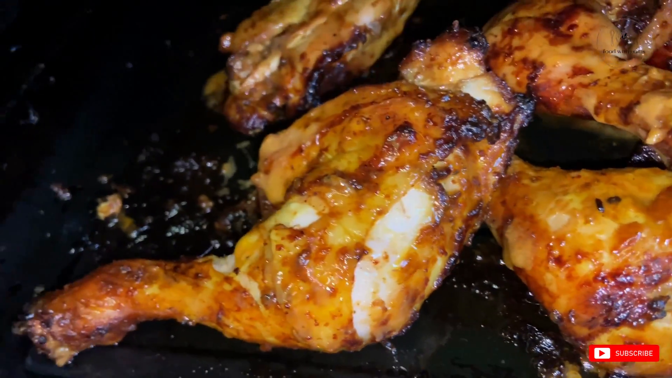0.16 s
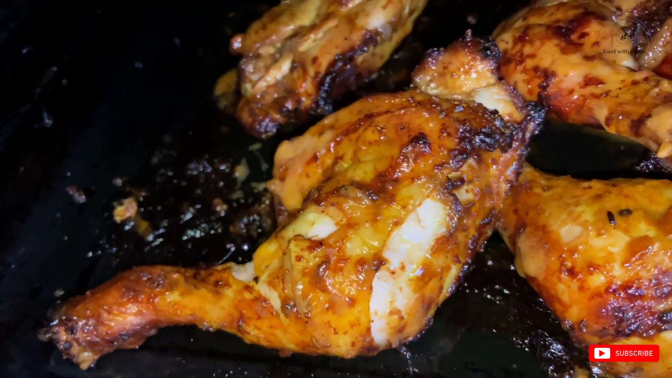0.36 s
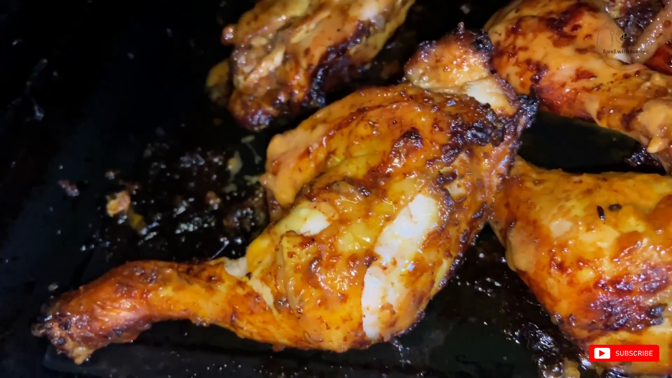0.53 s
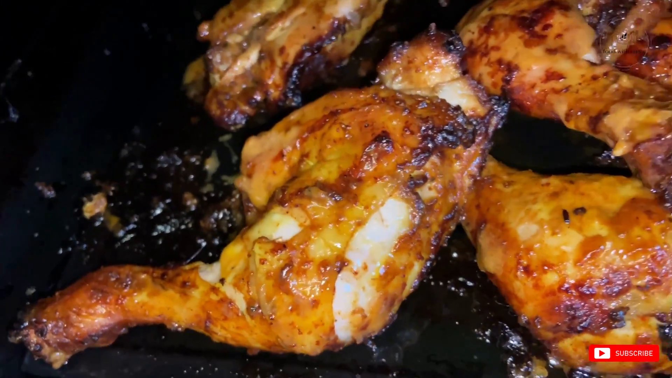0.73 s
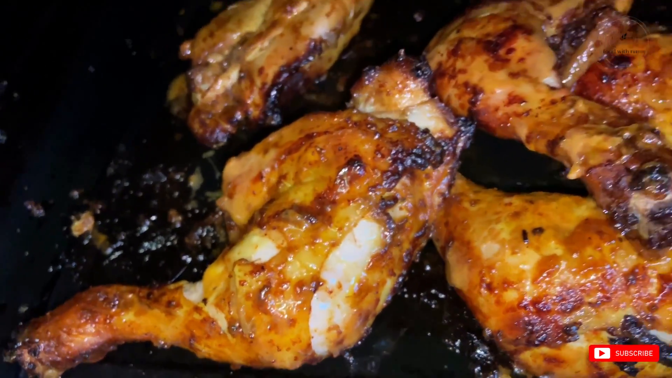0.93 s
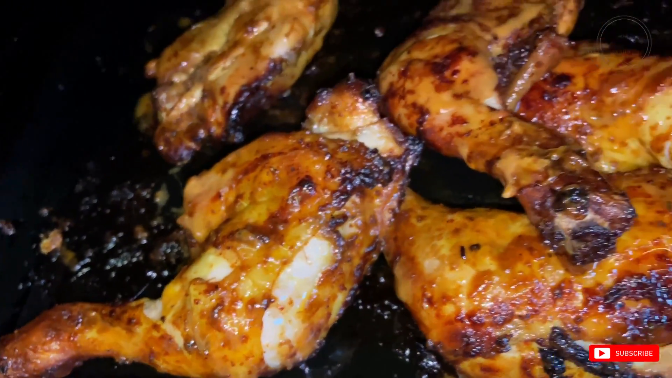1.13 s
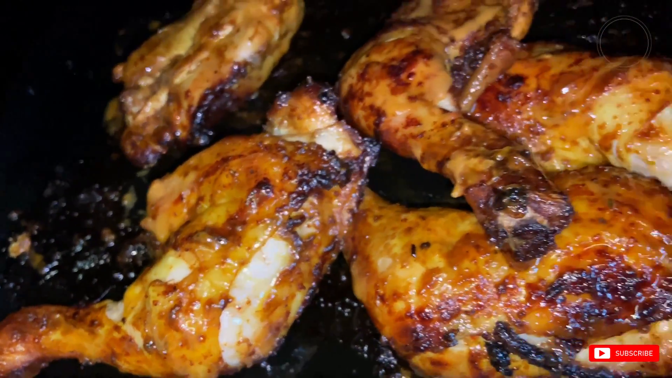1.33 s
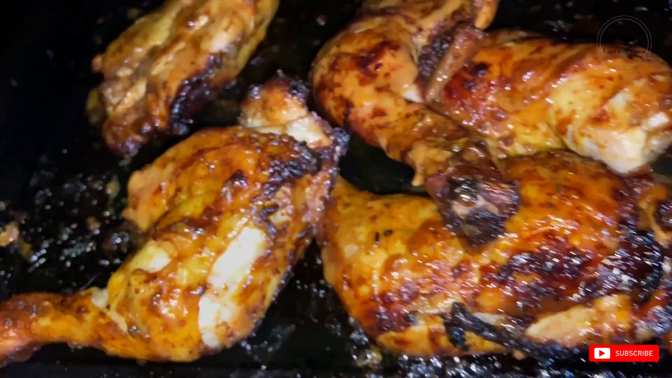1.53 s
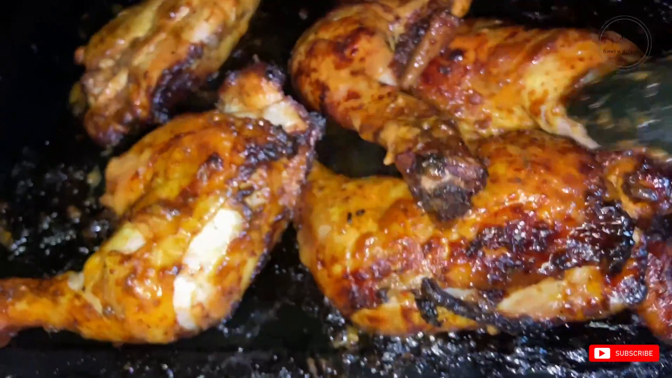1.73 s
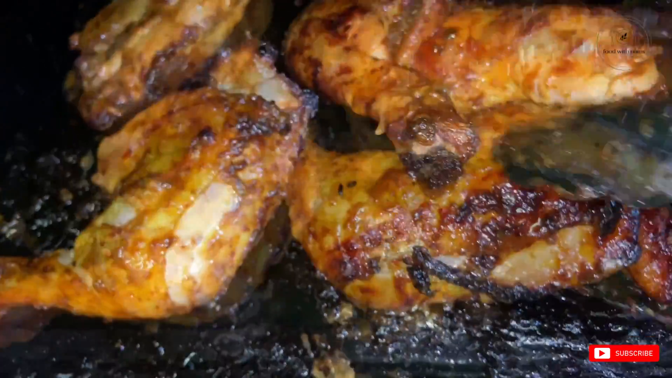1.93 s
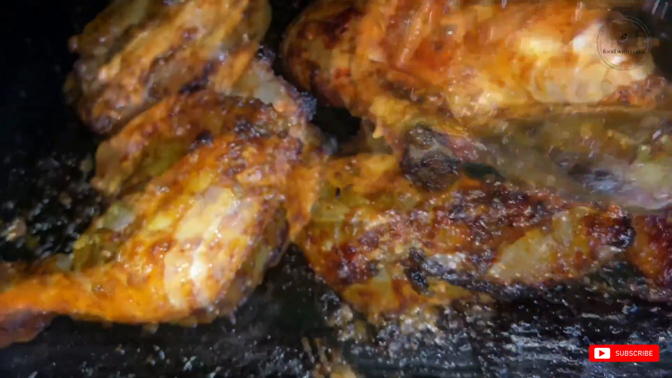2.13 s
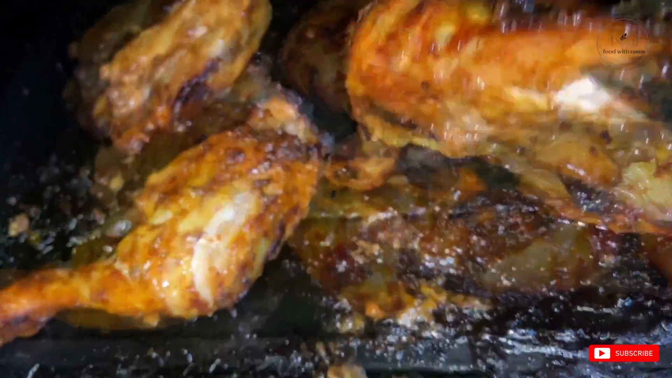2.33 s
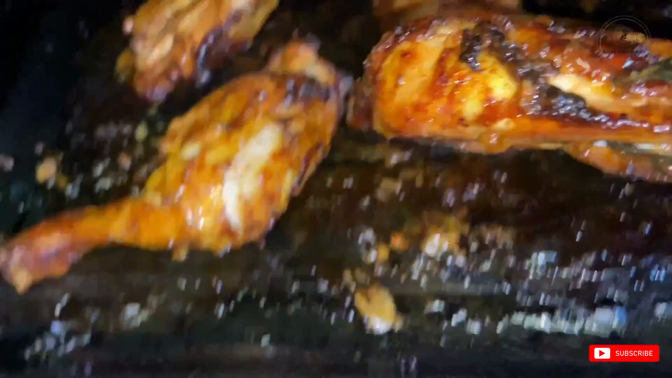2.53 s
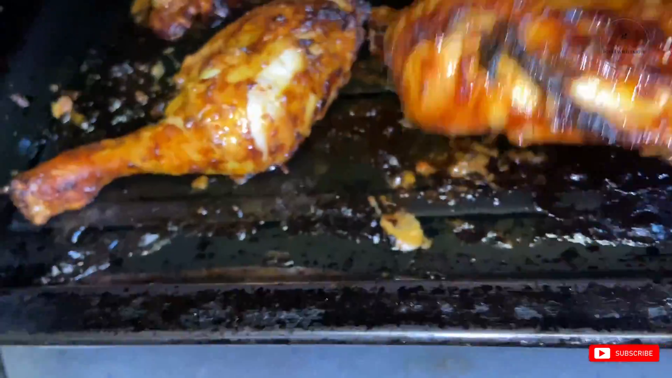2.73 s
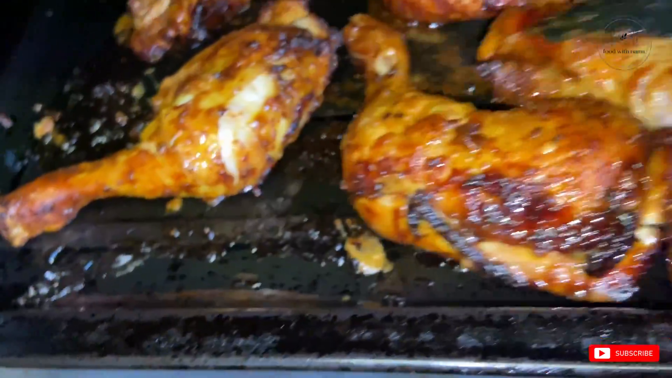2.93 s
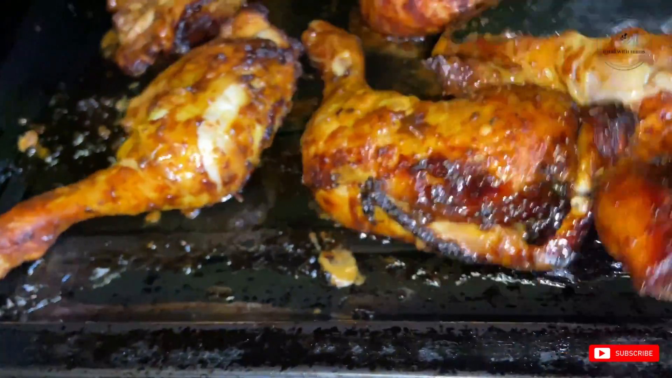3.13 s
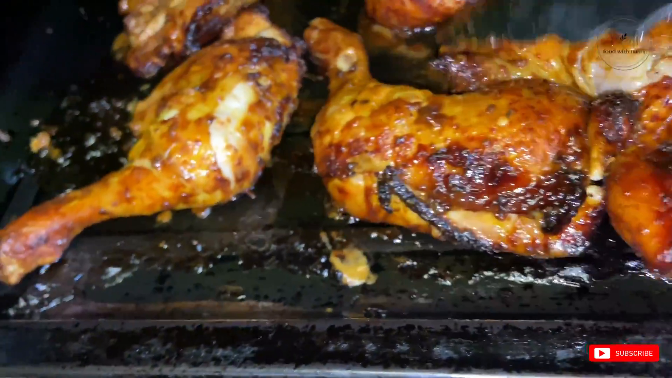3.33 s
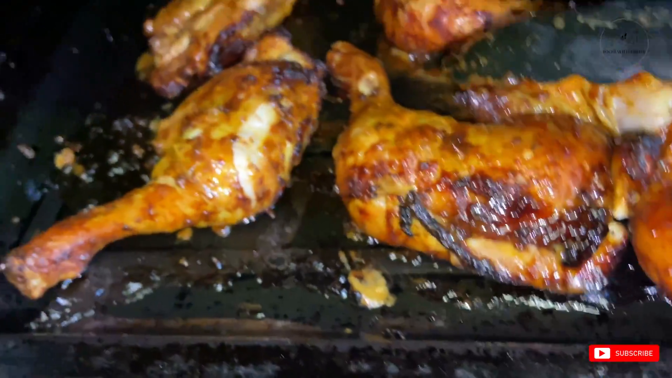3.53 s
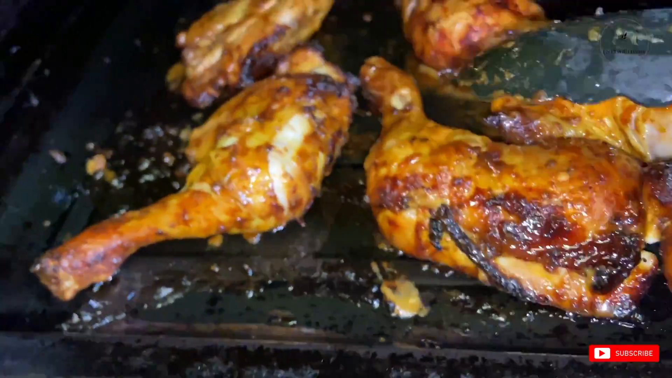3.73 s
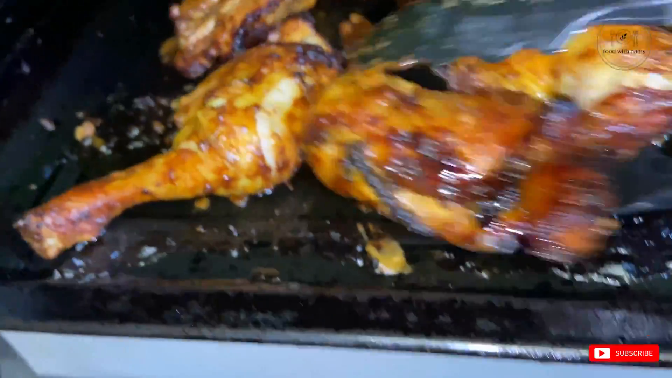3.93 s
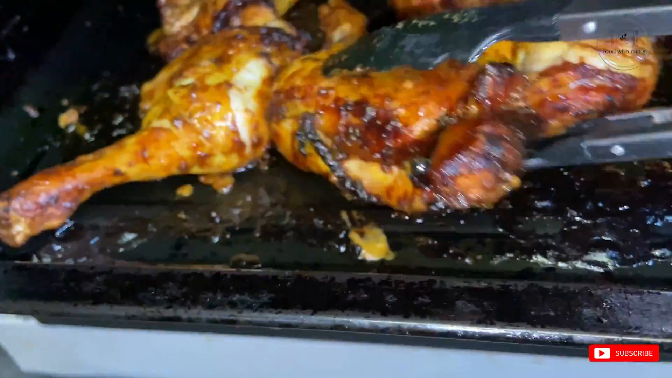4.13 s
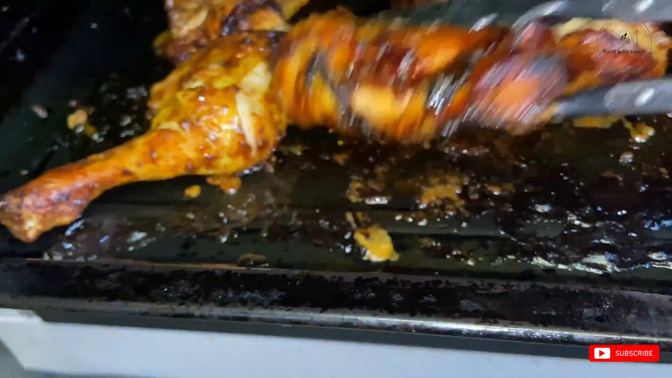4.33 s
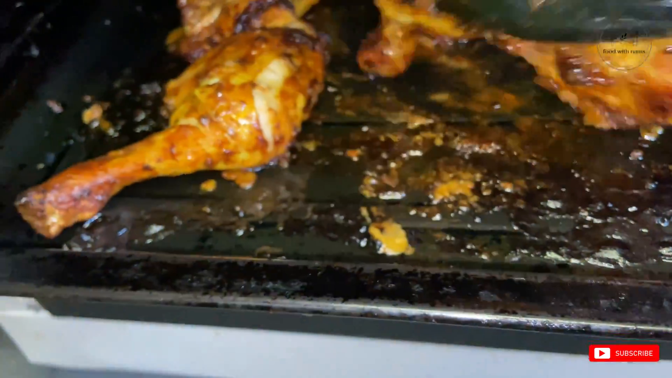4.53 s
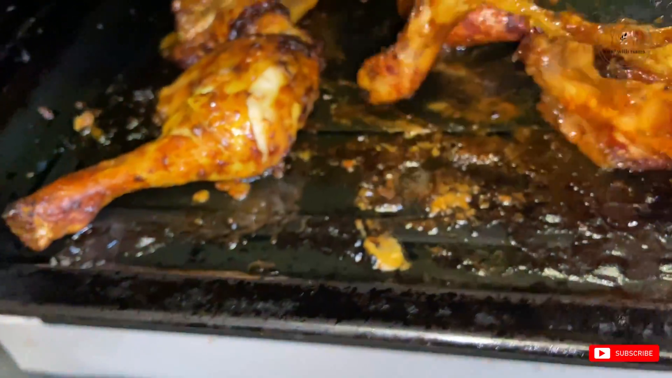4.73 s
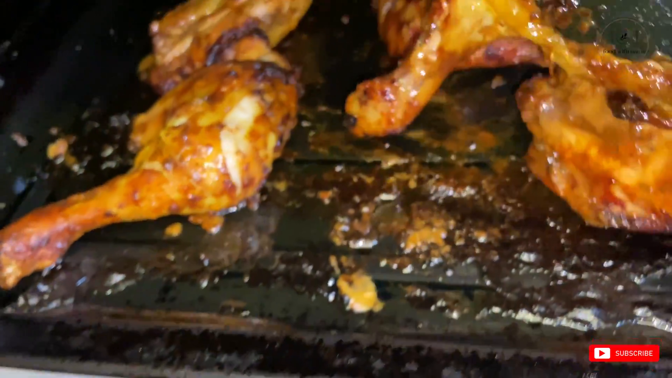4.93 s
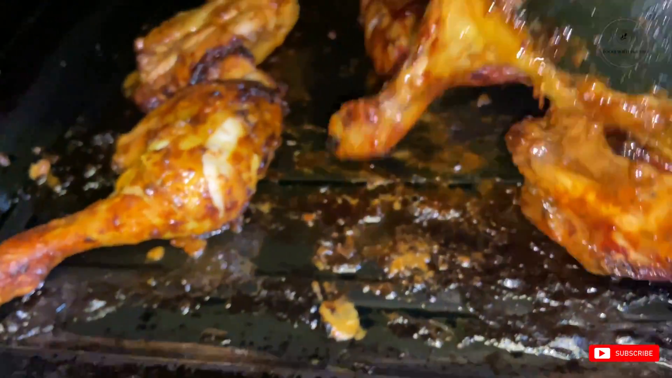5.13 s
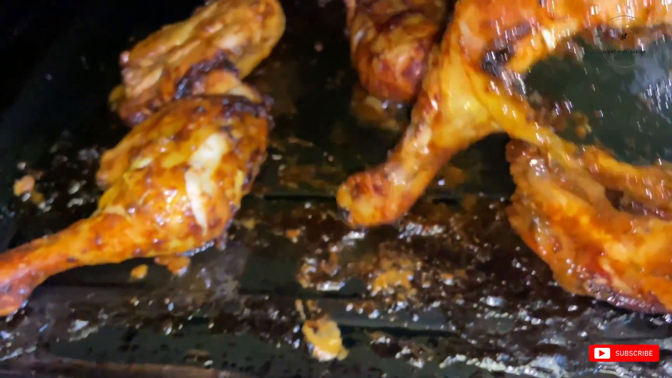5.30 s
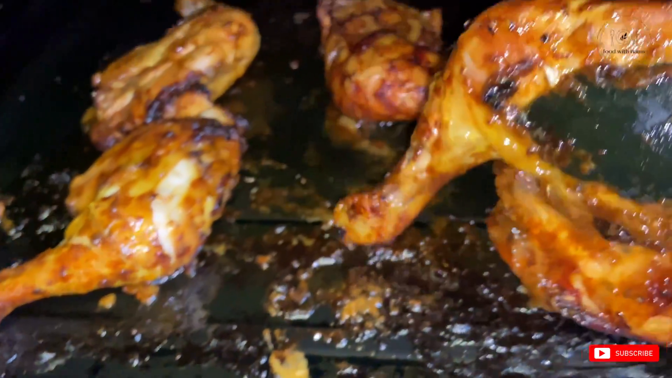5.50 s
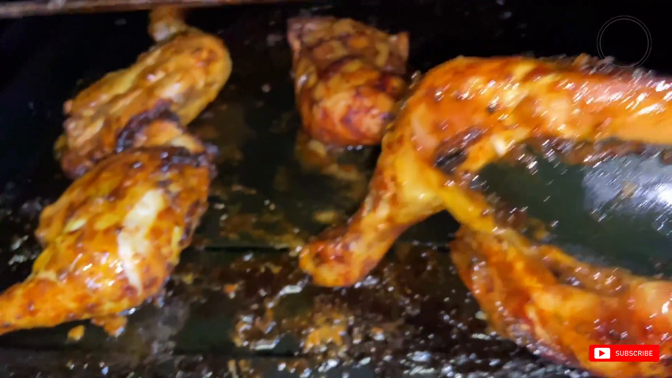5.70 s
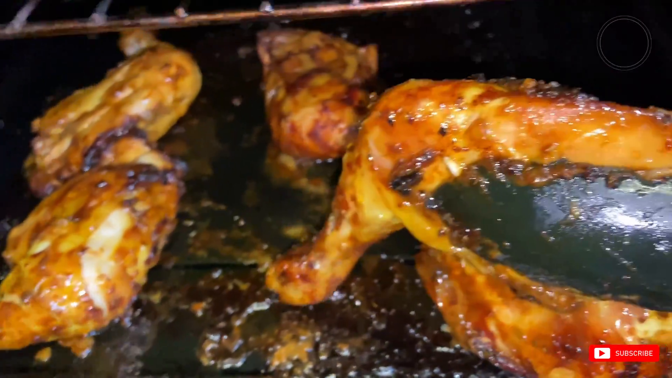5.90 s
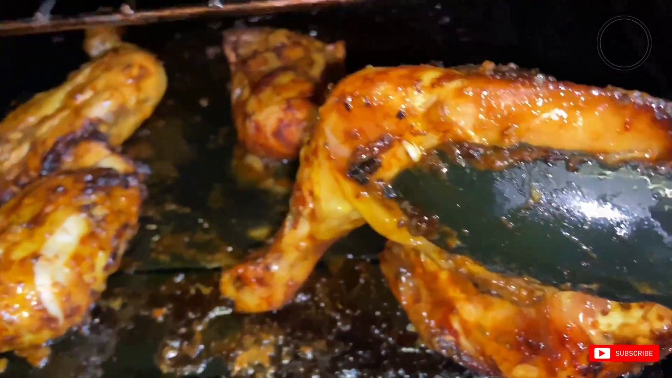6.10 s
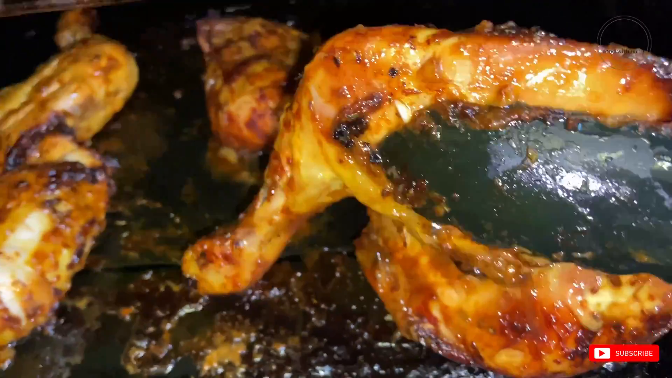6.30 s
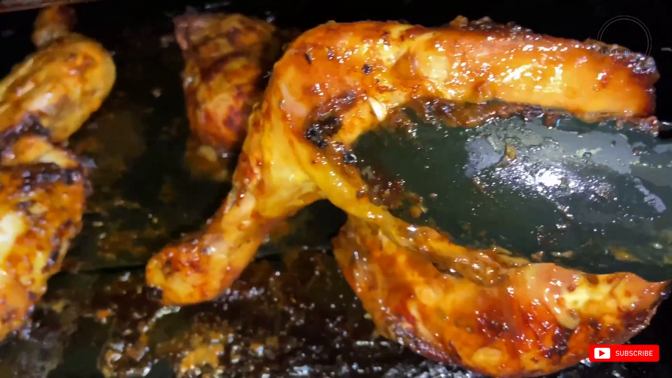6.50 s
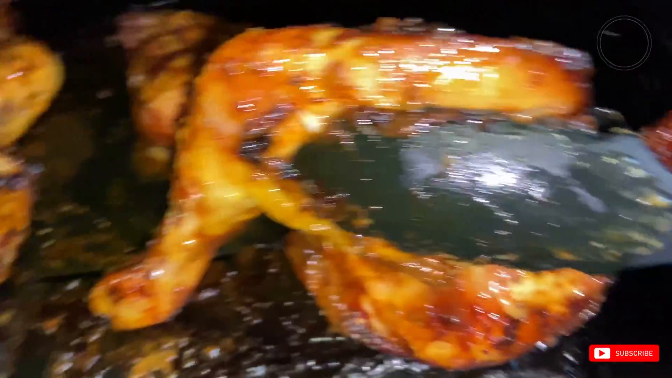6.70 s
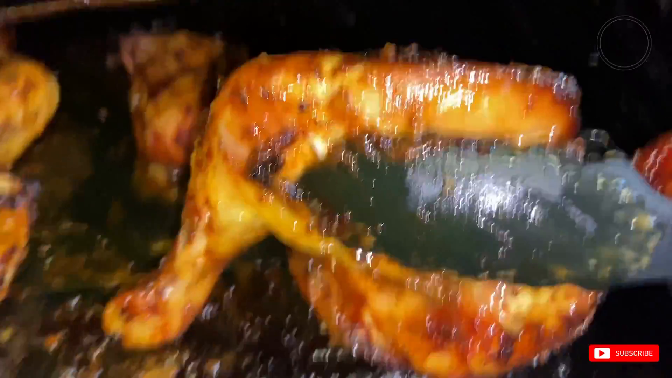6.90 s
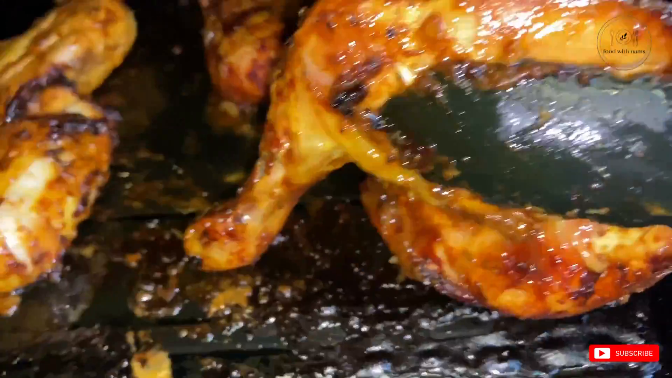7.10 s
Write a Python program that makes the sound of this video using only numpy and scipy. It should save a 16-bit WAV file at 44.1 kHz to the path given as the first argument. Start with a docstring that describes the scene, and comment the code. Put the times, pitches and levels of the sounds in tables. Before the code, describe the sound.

A close stereo pickup in a small, fairly dry kitchen, with a faint, low fan-like hum throughout. The first second is nearly still, with a tiny tick and a dry snap. At 1.25 s sticky skin tears with a bright crackle and a light tray rattle; at 1.47 s the loudest event lands, a hollow low boom with a brief metallic clang and tong clack. Scraping, tearing and a rumbling drag continue to about 2 s, with a duller thump at 1.9 s. Light ticks, peels and soft bumps fill 2.1-3 s. Rounded meaty thuds strike the tray at 3.15, 3.45 and 4.05 s, with a small tear just before the last. Faint ticks follow, then a sharp clattering cluster of tong clicks around 4.8-5.05 s. After that only quiet rubbing, slight sizzle-like friction and isolated ticks, including a thin high one near 6.7 s, until about 7 s.

```python
"""Tongs turn pieces of roast chicken on a sheet-metal oven tray in a small kitchen.
Landing pieces push the low tray modes into a thud, and a rattle of contacts rings the upper ones.
Band-passed contact bursts make ticks, snaps and tears; clumped slips and soft shoves make the drag.
Below runs a fan-like hum of shaped noise with wavering narrow bands; short decaying noise is the room.
Two microphone ports hear it all, differing by phase, by diffuse sound and by a lean in level."""
import sys
import numpy as np
from scipy import signal
from scipy.fft import rfft, irfft
from scipy.io import wavfile

SR = 44100
rng = np.random.default_rng(int(sys.argv[2]) if len(sys.argv) > 2 else 0)


def invert_db(x):
    """Field ratio 10**(x/20) for x, a level in decibels (scalar or array-like)."""
    u = np.asarray(x, float) / 20
    return 10 ** u


def master(y):
    """Save y as 16-bit WAV."""
    cut = np.clip(np.atleast_2d(y).T, -1, 1)
    pcm = np.round(cut * 32767)  # scale
    wavfile.write(sys.argv[1], SR, pcm.astype(np.int16))


N = 315315

# spectrum of the hum's noise floor, shape only: [f/Hz, density level/dB per Hz]
HUM_SPECTRUM = [(30, -14), (50, 0.5), (108, -1), (250, -14), (500, -17), (1200, -31), (3150, -55.5),
                (9000, -31), (12600, -53.5), (15500, -60)]
# narrow bands over that floor: [centre f/Hz, width f/Hz, level/dB against the floor]
HUM_BANDS = [(112.3, 34, -6), (246.6, 20.5, -20), (361.7, 30.5, -8), (777, 73, -25), (1372, 27, -24),
             (1822, 120, -17.5), (1985, 105, -17.5), (4542, 66, -27.5), (4614, 710, -18.5),
             (7190, 410, -15.5), (12800, 950, -26)]
HUM_DB = -53.5   # rms of the floor

ROOM_T60_S, ROOM_DB = 0.24, -6
DIFFUSE_T60_S = 0.2

# modes of the bare tray: [f/Hz, level/dB, t60/s]; the first six lie below 250 Hz
TRAY_MODES = [(57.4, 1, 1), (96.4, 6.5, 1), (119.8, 7, 1), (153.5, 3.5, 0.66), (186.2, 4, 0.34),
              (233, -4, 0.27), (342.8, -10, 1), (395.6, 3, 0.51), (421, -2.5, 0.48), (560.7, -4.5, 0.31),
              (624, -8, 0.23), (823.2, -5, 0.41), (892, -9.5, 0.44), (1060, -3, 0.13), (1212, -13.5, 0.3),
              (1327, -16, 0.3), (1870, -16.5, 0.46), (1996, -19, 0.3)]
LOADED_RING = 0.47   # meat on the tray shortens the rings after a landing to this share

# dragging over the tray: [t/s, rasp level/dB, low rumble level/dB]
DRAG_LEVELS = [(0, -67, -55.5), (1.241, -67.5, -71), (1.3, -55.5, -49), (1.605, -59, -34.5),
               (1.65, -49.5, -43), (1.74, -55, -39), (1.88, -58, -40), (2.02, -70.5, -45),
               (2.42, -68, -55.5), (2.62, -59, -48), (2.8, -63.5, -56.5), (2.95, -59.5, -50.5),
               (3.4, -68, -40.5), (3.8, -61.5, -48), (4.3, -65.5, -48.5), (4.65, -63.5, -55),
               (5.05, -62, -54.5), (5.4, -65, -51), (6.0, -68, -58.5), (6.7, -65, -53), (7.15, -67.5, -57)]
SIZZLE_DB, SIZZLE_AT_RASP_DB = -69, -66.5   # sizzle level at this rasp level
SIZZLE_FOLLOWS = 0.71   # share of the rasp's swing in dB

# tongs ticking on metal or sticky skin: [t/s, peak level/dB, centre f/Hz, width/octaves]
TICKS = [(0.224, -50, 1120, 1.1), (1.473, -27.5, 1280, 2.6), (1.487, -30.5, 2750, 1.82),
         (1.706, -40, 1900, 0.25), (1.943, -43, 5040, 1.2), (2.026, -48, 11200, 0.42),
         (2.118, -47, 4450, 1), (2.514, -45.5, 2500, 3.5), (2.589, -41, 2310, 1.05),
         (2.755, -51.5, 1150, 0.74), (2.892, -42.5, 1490, 0.73), (2.914, -40.5, 4000, 1.8),
         (3.585, -43.5, 820, 0.54), (3.85, -45.5, 5100, 1.4), (4.308, -47.5, 10900, 0.37),
         (4.392, -49, 11400, 0.24), (4.403, -44.5, 2820, 0.37), (4.408, -45.5, 3400, 0.2),
         (4.438, -47, 4120, 0.47), (4.595, -45, 11300, 0.27), (4.635, -49.5, 910, 1.1),
         (4.814, -48, 3320, 0.92), (4.834, -40, 4870, 2.2), (4.856, -40, 4870, 0.88),
         (4.934, -43.5, 3570, 1.3), (4.954, -37, 12500, 0.55), (4.979, -27.5, 4220, 2.23),
         (4.98, -36.5, 2880, 0.19), (4.996, -33.5, 1940, 2.2), (5.01, -38, 3400, 0.86),
         (5.021, -35, 1900, 0.97), (5.033, -38, 2430, 3.2), (5.284, -41, 6350, 1.4),
         (5.527, -45, 1890, 1.25), (6.022, -45, 732, 0.25), (6.715, -34, 12800, 0.76)]
TICK_T60_S, TICK_SHORTENS = 0.15, 0.72   # at 1 kHz; power of the pitch by which higher ticks die faster
# lone dry snaps: [t/s, peak level/dB, centre f/Hz]
SNAPS = [(0.614, -40.5, 1800), (2.075, -46, 11500), (2.357, -42.5, 10200), (2.696, -46, 7900),
         (2.408, -50, 2020), (2.8, -40, 4000), (7.022, -45, 2520)]
SNAP_OCTAVES, SNAP_T60_S = 1.8, 0.015
# skin tearing off the metal in broad bright bursts: [t/s, peak level/dB, t60/s]
TEARS = [(1.26, -30.5, 0.073), (1.622, -33.5, 0.35), (1.705, -28, 0.066), (1.757, -38, 0.077),
         (2.175, -36.5, 0.09), (2.882, -35, 0.23), (3.935, -42, 0.026), (3.948, -37.5, 0.095),
         (6.641, -47.5, 0.38)]
TEAR_HZ, TEAR_OCTAVES = 6220, 4.8

# blows on the tray: [t/s, boom peak level/dB, boom f/Hz, clang over boom level/dB, crack over boom level/dB]
THUDS = [(1.261, -36, 81, 2, -4), (1.376, -33.5, 108, -5.5, -26), (1.474, -10, 113, -5, -14),
         (1.654, -30, 104, -2, -51), (1.902, -20.5, 153, -14, -52), (1.927, -31, 146, -4, -26),
         (2.159, -27.5, 141, -15, -25.5), (2.184, -29, 150, -10, -33), (2.544, -32, 60.7, -8, -55),
         (2.572, -31, 109, -26, -36), (2.838, -30.5, 62, -14.5, -29), (2.963, -38.5, 109, 2, -35),
         (3.137, -15.5, 163, -16, -12), (3.172, -21, 153, -9.5, -26), (3.451, -18.5, 137, -18, -14),
         (4.038, -22, 136, -17, -18), (4.281, -38.5, 130, -0.5, -32), (4.857, -42, 116, -13, -7),
         (4.981, -39.5, 156, 8, 5.5), (5.03, -38, 185, 4, -6), (6.025, -45, 97, -6, -1.5),
         (6.728, -40, 89.4, -23, -12.5)]
RATTLE_S, SWELL_S = 0.023, 0.0026   # time constants: contacts die away; the clang's drive builds up

# side level across frequency: [f/Hz, side against mid level/dB]; it falls steeply above 6 kHz
SIDE_LEVEL = [(40, -11), (90, -19.5), (200, -12), (380, -3), (750, 2), (2380, 0), (6000, 0),
              (7200, -11), (11000, -6.5), (15000, -4.5)]
# lean between the ports: [f/Hz, left over right level/dB]
LEAN = [(60, -1), (240, 3.5), (950, 3), (3770, 3), (15000, 0)]
DIRECT_SHARE, DIFFUSE_ABOVE_HZ = 0.65, 1300
CUTOFF_HZ = 16500   # 60 dB down from here upward


def rms_one(x):
    """Power normalisation: scale to rms 1."""
    return x / np.sqrt(np.mean(x ** 2) + 1e-20)


def peak_one(x):
    """Amplitude normalisation: scale to peak 1."""
    return x / np.abs(x).max()


def at_hz(points, hz):
    """Logarithmic interpolation: read a spectrum on a log-frequency axis."""
    points = np.array(points)
    return np.interp(np.log(hz + 1), np.log(points[:, 0] + 1), points[:, 1])


def band(x, low_hz, high_hz):
    """Band limitation: a Butterworth band-pass with second-order skirts."""
    edges = [max(low_hz, 15), min(high_hz, 0.45 * SR)]
    return signal.sosfilt(signal.butter(2, edges, "band", fs=SR, output="sos"), x)


def ring(x, hz, t60):
    """Damped resonance: a unit click sets a decaying sine of height 1 ringing."""
    radius = invert_db(-60 / (max(t60, 0.005) * SR))
    angle = 2 * np.pi * hz / SR
    return signal.lfilter([0, np.sin(angle)], [1, -2 * radius * np.cos(angle), radius ** 2], x + 1e-18)


def grains(per_s, spread_db, count):
    """Random impulse process: clicks of uneven size and sign."""
    sizes = invert_db(spread_db * np.minimum(rng.exponential(1, count), 4))
    signs = rng.choice([-1, 1], count)
    return sizes * signs * (rng.random(count) < per_s / SR)


def flutter(per_s):
    """Slow random modulation: straight lines between normal draws of spread 1."""
    count = int(N / SR * per_s) + 2
    return np.interp(np.arange(N) / SR * per_s, np.arange(count), rng.standard_normal(count))


def add(out, s, x):
    """Superposition: mix a short sound in at time s."""
    i = round(s * SR)
    out[i:i + len(x)] += x[:N - i]


def hum():
    """Stationary coloured noise: a falling spectrum, with narrow bands that stand out and waver."""
    hz, white = np.fft.rfftfreq(N, 1 / SR), rng.standard_normal(N)
    floor = irfft(rfft(white) * invert_db(at_hz(HUM_SPECTRUM, hz)), N)
    tone = rms_one(floor) * invert_db(1.0 * flutter(4.39))
    for centre_hz, width_hz, db in HUM_BANDS:
        # reversed in time, the same noise serves as another draw
        narrow = band(white[::-1], centre_hz - width_hz / 2, centre_hz + width_hz / 2)
        tone += invert_db(db + 2.0 * flutter(9)) * rms_one(narrow)
    return invert_db(HUM_DB) * tone


def echoes(t60):
    """Statistical reverberation: dense exponentially decaying reflections of energy 1."""
    t = np.arange(SR // 2) / SR
    tail = rng.standard_normal(len(t)) * invert_db(-60 * t / t60) * (t > 0.003)
    return tail / np.sqrt(np.sum(tail ** 2))


def drag():
    """Stick-slip friction: clumped slips rasp and sizzle; soft shoves keep low tray modes murmuring."""
    s, *columns = np.transpose(DRAG_LEVELS)
    rasp_db, rumble_db = [np.interp(np.arange(N) / SR, s, levels) for levels in columns]
    sizzle_db = SIZZLE_DB + SIZZLE_FOLLOWS * (rasp_db - SIZZLE_AT_RASP_DB)
    clumps = invert_db(2.37 * flutter(60))

    slips = grains(4000, spread_db=1.0, count=N) * clumps
    # the rubbing contact shortens each ring to a third
    upper = sum(invert_db(db) * ring(slips, hz, t60 / 3) for hz, db, t60 in TRAY_MODES[6:])
    rasp = rms_one(band(slips, 240, 2220)) + rms_one(upper)

    fine_slips = grains(4000, spread_db=2.0, count=N) * clumps * invert_db(4.4 * flutter(25.05))
    sizzle = rms_one(band(fine_slips, 4800, 15400))

    shoves = rng.standard_normal(N)
    rumble = rms_one(sum(invert_db(db) * ring(shoves, hz, t60 / 3) for hz, db, t60 in TRAY_MODES[1:6]))
    return invert_db(rasp_db) * rasp + invert_db(sizzle_db) * sizzle + invert_db(rumble_db) * rumble


def ticks():
    """Filtered contact noise: each tick, snap or tear is a swelling, decaying burst in one broad band."""
    out, t = np.zeros(N), np.arange(SR // 4) / SR
    rows = [(s, db, hz, octaves, TICK_T60_S * (1000 / hz) ** TICK_SHORTENS) for s, db, hz, octaves in TICKS]
    rows += [(s, db, hz, SNAP_OCTAVES, SNAP_T60_S) for s, db, hz in SNAPS]
    rows += [(s, db, TEAR_HZ, TEAR_OCTAVES, t60) for s, db, t60 in TEARS]
    for s, db, hz, octaves, t60 in rows:
        t60, half = max(t60, 0.005), 2 ** (max(octaves, 0.1) / 2)
        # uneven slips: a new level every 256 samples
        clumps = invert_db(2.2 * np.repeat(rng.standard_normal(len(t) // 256 + 1), 256)[:len(t)])
        contacts = grains(3500, spread_db=2.5, count=len(t)) + 0.29 * rng.standard_normal(len(t))
        envelope = (1 - np.exp(-t / (0.02 * t60))) * invert_db(-60 * t / t60)
        burst = band(contacts * clumps * envelope, hz / half, hz * half)
        burst = band(burst, hz / half / 2.3, hz * half * 1.24)   # steeper outer skirts
        add(out, s, invert_db(db) * peak_one(burst))
    return out


def tray_boom(t, boom_hz):
    """Modal excitation: a soft push sounds the low modes, most strongly those near the boom pitch."""
    push = np.exp(-((t - 0.0065) / 0.0011) ** 2)   # soft and a little late
    boom = np.zeros(len(t))
    for hz, level_db, t60 in TRAY_MODES[:6]:
        slope = 40 if hz < boom_hz else 10   # dB per squared octave away from the boom pitch
        distance_db = slope * np.log2(hz / boom_hz) ** 2
        boom += invert_db(level_db - distance_db) * ring(push, hz, t60 * LOADED_RING)
    boom *= 1 + 1.7 * np.exp(-(t / 0.074) ** 4)   # the meat settles and damps the first swing
    return band(boom, 0.64 * boom_hz, 257)   # a thin sheet radiates little below its boom


def tray_clang(drive, clang_db, crack_db):
    """Modal ringing: contacts sound each upper mode together with a shorter, slightly detuned twin."""
    clang = 0
    for hz, level_db, t60 in TRAY_MODES[6:]:
        # soft blows miss the high modes
        reach_db = 0.34 * (crack_db - clang_db) * np.log2(hz / 400) + rng.standard_normal()
        twin_hz = hz * (1 + rng.uniform(-0.02, 0.02))
        pair = ring(drive, hz, t60 * LOADED_RING) + 0.5 * ring(drive, twin_hz, t60 * LOADED_RING / 2)
        clang = clang + invert_db(level_db + reach_db) * peak_one(pair)
    return peak_one(clang)


def thuds():
    """Impact on a plate: a landing weight gives boom, rattling contacts give clang, noise adds crack."""
    out, t = np.zeros(N), np.arange(SR // 2) / SR
    swell = (1 - np.exp(-t / SWELL_S)) ** 2
    for s, db, boom_hz, clang_db, crack_db in THUDS:
        contacts = grains(1500, spread_db=5.5, count=len(t)) * np.exp(-t / RATTLE_S)
        spray = rng.standard_normal(len(t)) * invert_db(-60 * t / 0.15)
        boom = peak_one(tray_boom(t, boom_hz))
        clang = tray_clang(swell * contacts, clang_db, crack_db)
        clang = clang + 0.087 * peak_one(band(swell * spray, 400, 990))
        crack = peak_one(band(band(contacts + 34.0 * spray, 200, 1290), 210, 3160))
        add(out, s, invert_db(db) * (boom + invert_db(clang_db) * clang + invert_db(crack_db) * crack))
    return out


def scene():
    """Direct and diffuse fields: row 0 is shared by both ports, row 1 an unrelated diffuse draw."""
    direct = thuds() + ticks() + drag()
    room = signal.fftconvolve(direct, echoes(ROOM_T60_S))[:N]
    diffuse = signal.fftconvolve(direct, echoes(DIFFUSE_T60_S))[:N]
    shared = direct + invert_db(ROOM_DB) * band(room, 220, SR / 2) + hum()
    return np.array([shared, diffuse + hum()])


def low_pass(x):
    """Removes everything above the highest recorded frequency."""
    return signal.sosfilt(signal.butter(12, 16660, fs=SR, output="sos"), x)


def record(dry):
    """Two-port pickup: quadrature direct sound, diffuse sound and a level lean form the side signal."""
    dry = signal.sosfilt(signal.butter(4, 42, "high", fs=SR, output="sos"), dry)
    dry = signal.sosfilt(signal.cheby2(12, 60, CUTOFF_HZ, fs=SR, output="sos"), dry)
    hz, (mid, diffuse) = np.fft.rfftfreq(N, 1 / SR), rfft(dry)
    # higher up the side is mostly diffuse sound
    share = DIRECT_SHARE / (1 + (hz / DIFFUSE_ABOVE_HZ) ** 2)
    # 1j turns the direct sound by a quarter period
    apart = invert_db(at_hz(SIDE_LEVEL, hz)) * (1j * np.sqrt(share) * mid + np.sqrt(1 - share) * diffuse)
    lean = np.tanh(at_hz(LEAN, hz) * np.log(10) / 40) * mid   # side over mid for a level ratio in dB
    side = irfft(apart + lean, N)
    mix = dry[0] + side * [[1], [-1]]
    return low_pass(mix)


dry = scene()
out = record(dry)
master(out)
```